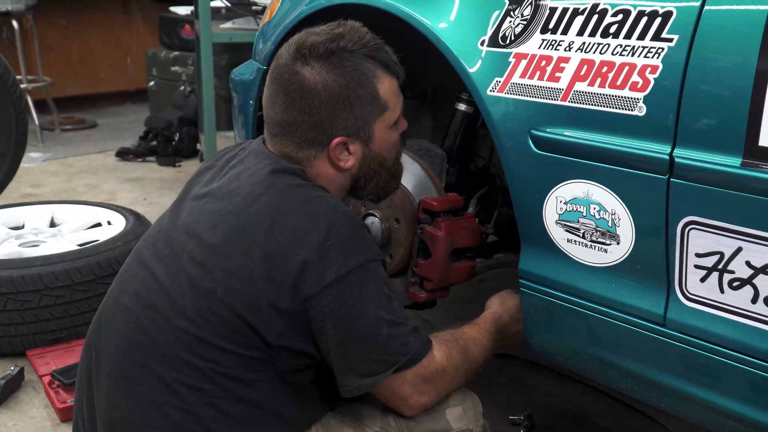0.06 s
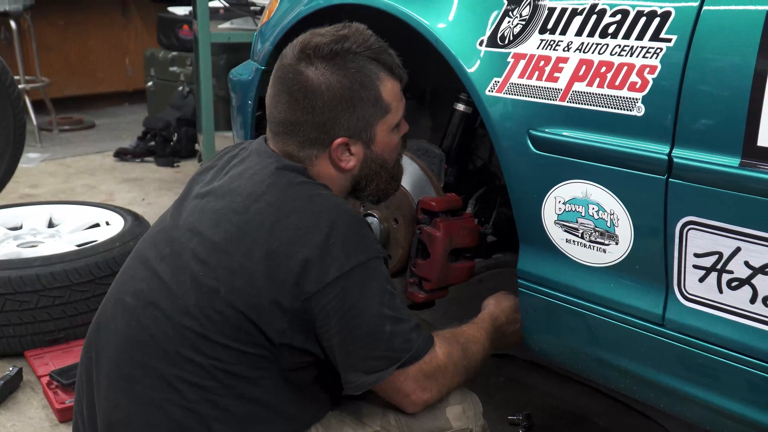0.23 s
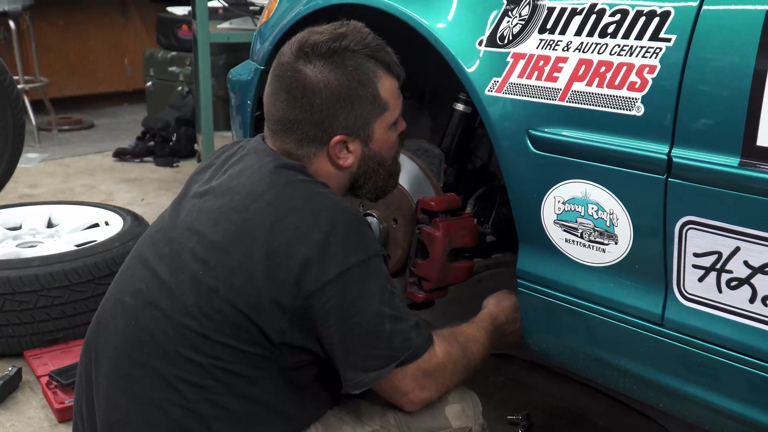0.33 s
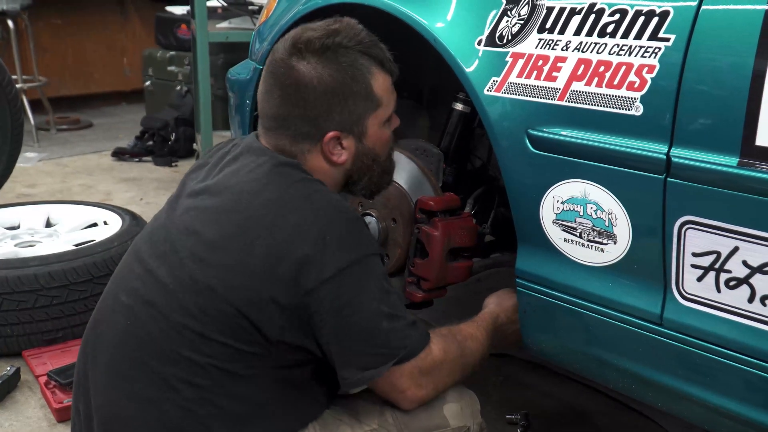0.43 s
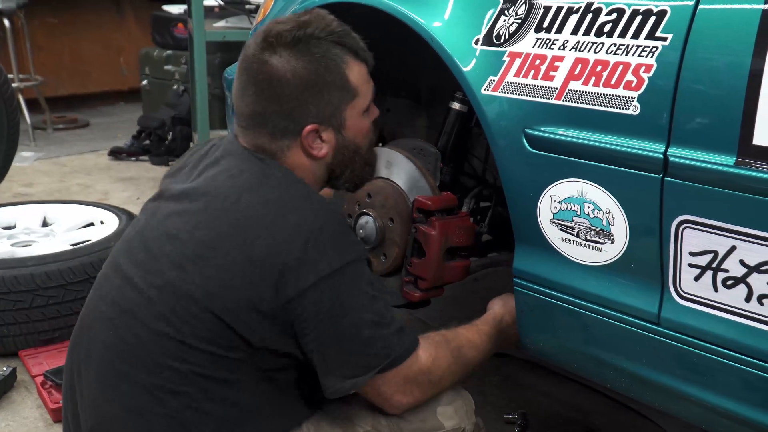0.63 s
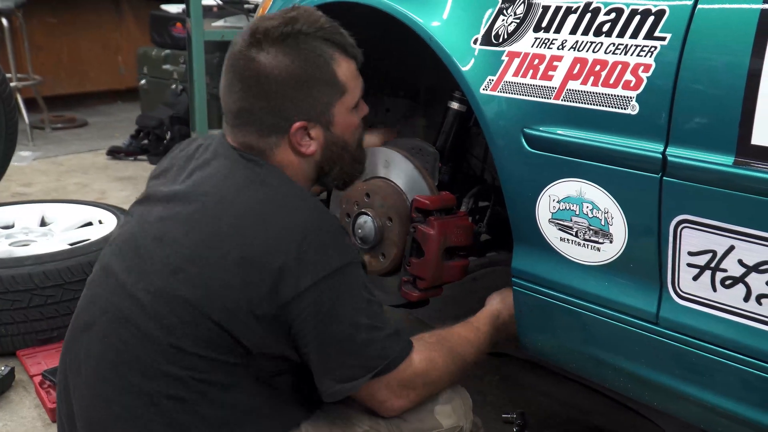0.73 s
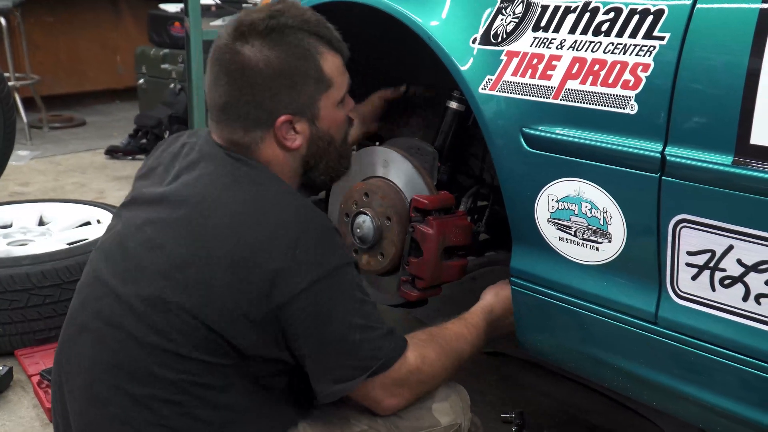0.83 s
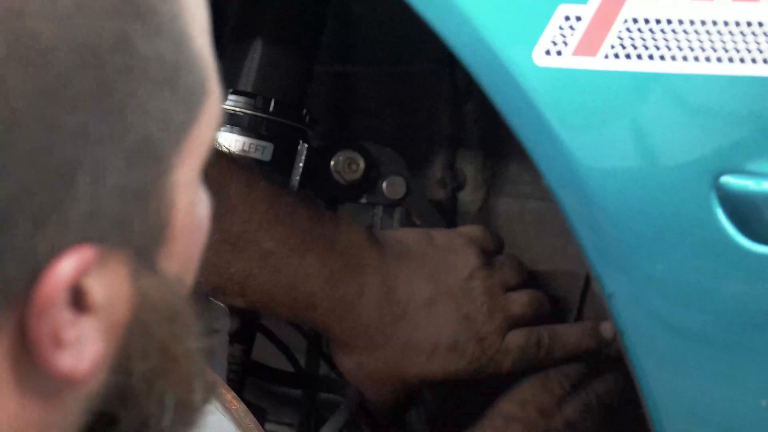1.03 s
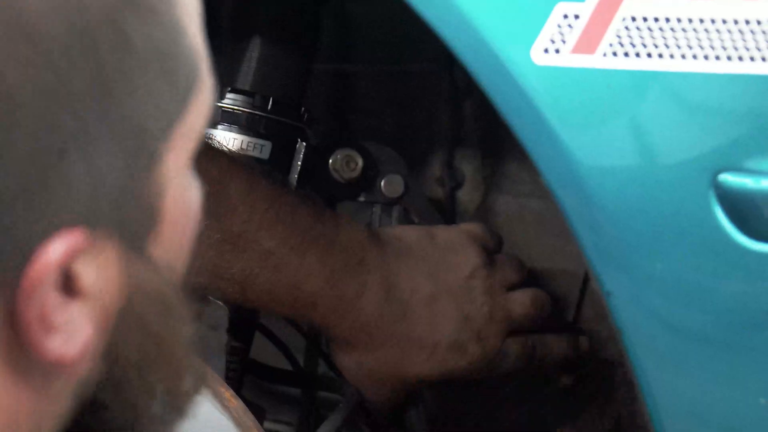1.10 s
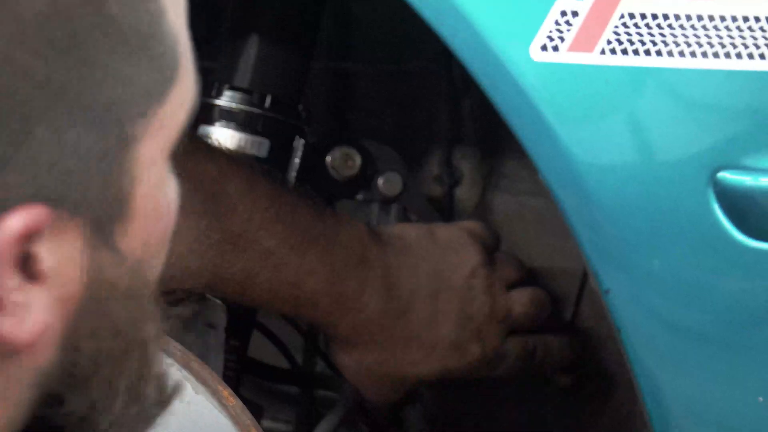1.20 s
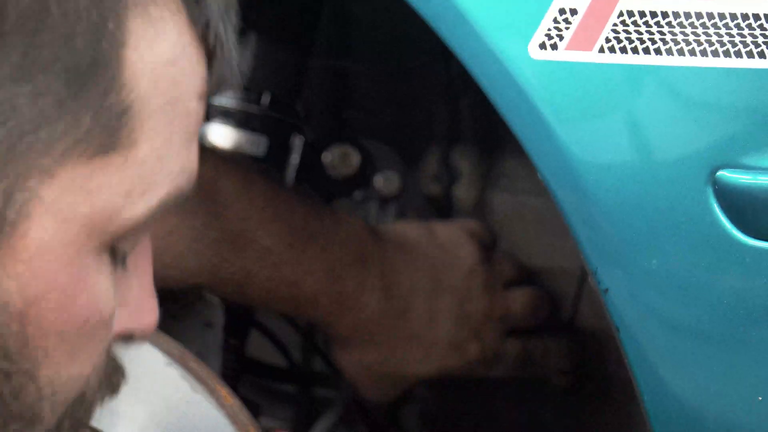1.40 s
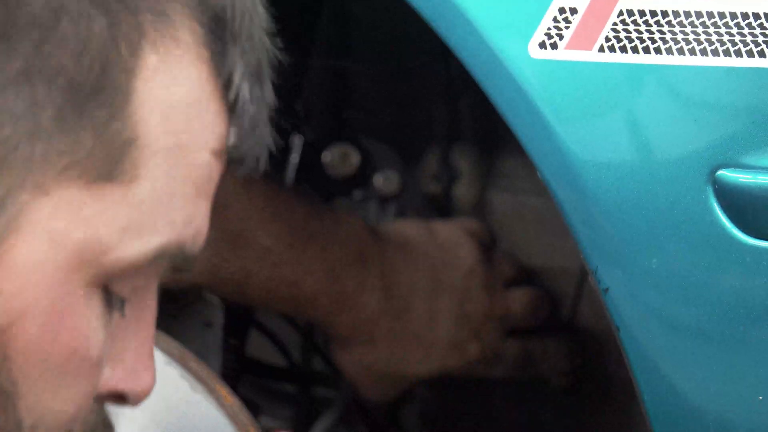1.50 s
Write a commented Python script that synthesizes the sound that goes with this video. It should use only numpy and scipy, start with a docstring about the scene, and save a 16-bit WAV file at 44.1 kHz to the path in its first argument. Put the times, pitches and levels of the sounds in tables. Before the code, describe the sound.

In a quiet garage, a rusty steel joint cracks loose with one quick creak and a short metallic ring. Faint handling ticks come after it, while the soft airy hum and hiss behind them abruptly get quieter.

```python
"""One short creaking crack in a garage, as a stuck steel suspension part gives way.
The joint sticks and slips about a dozen times within 60 ms: each slip excites the resonances of the
steel, rust grinds in the joint, and the room reverberates. Behind it lie a low rumble, fan-like air
noise and a thin hiss, which all drop abruptly after a second. Hand and tool make a few faint ticks,
and a sleeve brushes the car."""
import sys
import numpy as np
from scipy import signal
from scipy.fft import rfft, irfft
from scipy.io import wavfile

SR = 44100
rng = np.random.default_rng(int(sys.argv[2]) if len(sys.argv) > 2 else 0)


def transcribe(u):
    """Save the signal u as a 16-bit wav file named by the first command-line argument.

    u: samples, shape (n,) or (channels, n), limited to [-1, 1]; the rate is SR.
    q: integer samples, one column per channel.
    """
    v = np.clip(np.atleast_2d(u).T, -1, 1)
    q = np.round(v * 32767).astype(np.int16)
    wavfile.write(sys.argv[1], SR, q)


N = 68355
T = np.arange(N) / SR

# normal modes of the steel: pitch_hz, level_db, t60_s
STEEL_MODES = [(236, -39, .33), (296, -41, .5), (518, -39, .6), (795, -33, .52), (867, -39, .52),
               (1215, -32, .38), (1327, -32, .26), (1421, -39, .42), (1663, -37, .28), (1883, -34, .38),
               (2072, -34, .32), (2237, -35, .38), (2325, -24, .28), (2356, -32, .22), (2480, -29, .42),
               (2550, -22.5, .32), (2602, -30, .24), (2652, -30, .36), (2753, -30, .31), (2946, -35, .3),
               (4124, -42, .32), (4310, -37, .22), (4890, -42, .22), (8530, -45, .26), (8624, -46, .36),
               (9985, -46, .26)]


def from_db(db):
    """Decibels to amplitude ratio."""
    return 10 ** (np.asarray(db) / 20)


def rms_one(x):
    """Normalise to unit rms."""
    return x / np.sqrt(np.mean(x ** 2) + 1e-20)


def peak_at(x, db):
    """Normalise to a peak level."""
    return from_db(db) * x / (np.abs(x).max() + 1e-20)


def at_hz(points, hz):
    """Interpolate a table on a log-frequency axis."""
    frequencies, values = np.transpose(points)
    return np.interp(np.log(np.maximum(hz, 1)), np.log(frequencies), values)


def coloured(x, spectrum):
    """Minimum-phase filter of unit power gain: folding the cepstrum makes it causal."""
    size = 2 * N
    gain = rms_one(from_db(at_hz(spectrum, np.arange(N + 1) * SR / size)))
    cepstrum = irfft(np.log(gain))
    cepstrum[1:N] *= 2
    cepstrum[N + 1:] = 0
    return irfft(rfft(x, size) * np.exp(rfft(cepstrum)))[:N]


def resonate(x, hz, width_hz):
    """Damped oscillator: a two-pole resonance with unit peak gain."""
    radius = np.exp(-np.pi * width_hz / SR)
    feedback = [1, -2 * radius * np.cos(2 * np.pi * hz / SR), radius ** 2]
    return signal.lfilter(np.array([1, 0, -1]) * (1 - radius ** 2) / 2, feedback, x + 1e-18)


def band(x, hz, width_hz):
    """Two resonators in cascade, for steep skirts."""
    return resonate(resonate(x, hz, width_hz), hz, width_hz)


def background():
    """Broadband air noise plus narrowband noise from rumble to hiss; all step down together."""
    # air spectra before and after the drop: frequency_hz, density_db
    air_before = [(60, -2), (130, -4), (240, -7.5), (460, 3), (680, -6), (930, -1), (1150, -4),
                  (1450, -6.5), (1800, -8.5), (2750, -11.5), (3300, -12), (5500, -22), (8000, -25),
                  (16000, -39.5)]
    air_after = [(60, -10), (140, 2), (300, -2.5), (460, 6), (620, -4.5), (900, 0.5), (1150, -5.5),
                 (1450, -3.5), (2000, -7.5), (2800, -10.5), (4500, -14.5), (5700, -19.5), (8000, -24),
                 (12000, -29.5), (16000, -47)]
    # narrow noise bands: centre_hz, width_hz, before_db, after_db
    drones = [(26, 8.5, -43.5, -59.5), (902, 77, -67, -78), (1450, 40, -72.5, -84.5),
              (2691, 120, -73, -88.5), (6630, 480, -68, -81)]
    drop_s, crossfade_s, drift_db_per_s = 0.993, .006, -0.8
    before = from_db(-57.5 + drift_db_per_s * (T - drop_s)) * coloured(rng.standard_normal(N), air_before)
    after = from_db(-69) * coloured(rng.standard_normal(N), air_after)
    for hz, width_hz, before_db, after_db in drones:
        drone = rms_one(band(rng.standard_normal(2 * N), hz, width_hz)[N:])  # steady state only
        before += from_db(before_db) * drone
        after += from_db(after_db) * drone
    dropped = np.clip((T - drop_s) / crossfade_s + .5, 0, 1)
    return before * (1 - dropped) + after * dropped


def garage_reverb(x):
    """Diffuse field: dense reflections build up quickly, then decay exponentially in each band."""
    # reverberation time: frequency_hz, t60_s
    decay_times = [(150, 0.4), (500, 0.63), (1200, 0.53), (2600, 0.525), (5000, 0.67), (9000, 0.4846),
                   (15000, 0.63)]
    # strength of the reverberation: frequency_hz, level_db
    room_colour = [(100, 6), (250, -2.5), (450, 1.5), (750, 0.5), (1300, -1.5), (2000, -3.5), (2600, -12),
                   (3500, -2.5), (4400, -10), (8500, -2.5), (15000, -15)]
    delay_s, build_s = 0.00567, 0.004
    edges_hz = np.geomspace(80, 18000, 15)
    white = rng.standard_normal((2, N))
    age = np.maximum(T - delay_s, 0)
    response = np.zeros(N)
    for k, (low, high) in enumerate(zip(edges_hz, edges_hz[1:])):
        hz = np.sqrt(low * high)
        decay = (1 - np.exp(-age / build_s)) * from_db(-60 * age / at_hz(decay_times, hz))
        noise = signal.sosfilt(signal.butter(2, [low, high], "band", fs=SR, output="sos"), white[k % 2])
        response += from_db(at_hz(room_colour, hz)) * noise * decay / np.sqrt(np.sum(decay ** 2))
    return signal.fftconvolve(x, response)[:N]


def sleeve_brush():
    """Friction noise: cloth slides over the car in one soft Gaussian swell."""
    # spectrum of the rubbing: frequency_hz, density_db
    cloth_colour = [(800, -19), (2500, 4), (3700, 5.5), (5500, -12.5), (10000, -14), (16000, -22)]
    centre_s, sigma_s = 1.348, .02
    swell = np.exp(-.5 * ((T - centre_s) / sigma_s) ** 2)
    return from_db(-70) * swell * coloured(rng.standard_normal(N), cloth_colour)


def handling_ticks():
    """Light impacts of hand and tool: band-limited noise bursts with fast exponential decay."""
    # contacts: start_s, peak_db, centre_hz, t60_s
    contacts = [(0.037, -49.5, 12800, 0.032), (0.367, -50, 13400, .025), (0.379, -54, 12400, .18),
                (0.603, -54.5, 4280, 0.023), (1.122, -65, 4470, 0.022), (1.209, -65.5, 3500, 0.037)]
    ticks = np.zeros(N)
    for start_s, peak_db, hz, t60_s in contacts:
        decay = (T >= start_s) * from_db(-60 * np.maximum(T - start_s, 0) / t60_s)
        ticks += peak_at(band(rng.standard_normal(N) * decay, hz, width_hz=.5 * hz), peak_db)
    return ticks


def rust_grinding():
    """Brittle fracture: a snap thuds through the assembly, then rust crumbles as shot noise."""
    # spectrum of the fractures: frequency_hz, density_db
    grit_colour = [(100, -17), (220, -2.5), (700, 1.5), (1100, 1), (1500, -3.5), (2400, -12.5),
                   (3200, -0.5), (3700, -6), (4400, -5.5), (5300, -6.5), (6200, -17.5), (7400, -11),
                   (8700, -14), (11000, -21.5), (16000, -35.5)]
    # low resonances of the whole assembly: centre_hz, width_hz, peak_db
    thud_modes = [(222.5, 42, -31.5), (744, 90, -31.5)]
    snap_s, full_s, release_s = 0.1936, 0.223, 0.237
    rise_db_per_s, fall_db_per_s = 560, 900
    grains_per_s, spread_db = 2500, 5.5
    envelope_db = -rise_db_per_s * np.maximum(full_s - T, 0)
    envelope_db -= fall_db_per_s * np.maximum(T - release_s, 0)
    sizes = from_db(spread_db * np.minimum(rng.exponential(1, N), 2)) * rng.choice([-1, 1], N)
    grains = rms_one(sizes * (rng.random(N) < grains_per_s / SR))
    grains *= from_db(-25.5 + envelope_db) * (T > snap_s)
    snap = signal.unit_impulse(N, int(snap_s * SR))
    grit = coloured(grains, grit_colour) + peak_at(coloured(snap, grit_colour), db=-21)
    through_steel = sum(resonate(grit, hz, width_hz=.012 * hz) for hz, _, _ in STEEL_MODES)
    thud = sum(peak_at(resonate(resonate(snap, hz, width), hz, hz), db) for hz, width, db in thud_modes)
    return grit + from_db(4) * through_steel + thud


def stick_slip():
    """Stick-slip excitation: each slip knocks the damped body and adds energy to the ringing modes."""
    # slips of the joint: start_s, strength_db
    slips = [(0.1957, -11), (0.1999, -11), (0.2035, -17), (0.2093, -15), (0.2138, -2), (0.2177, -2),
             (0.2209, -2), (0.2257, -4), (0.2303, -11), (0.2345, 1), (0.2387, 1), (0.2440, -8),
             (0.2537, -7)]
    # broad, heavily damped resonances: centre_hz, width_hz, peak_db
    body_modes = [(230, 180, -30), (481, 250, -34), (900, 410, -31.5), (1333.3, 170, -25), (1950, 120, -23),
                  (2526, 580, -9.5), (4052, 540, -27)]
    contact_hz, attack_s = 4600, 0.00081
    start_s, strength_db = np.transpose(slips)
    impulses = np.zeros(N)
    impulses[(start_s * SR).astype(int)] = from_db(strength_db)
    force = signal.sosfilt(signal.butter(2, contact_hz, fs=SR, output="sos"), impulses + 1e-18)
    knocks = sum(peak_at(band(force, hz, width), db) for hz, width, db in body_modes)
    power = signal.lfilter([1], [1, -np.exp(-1 / (attack_s * SR))], impulses ** 2 + 1e-18)
    ringing = np.zeros(N)
    for hz, level_db, t60_s in STEEL_MODES:
        retained = from_db(-60 / (t60_s * SR)) ** 2  # share of the energy left after one sample
        energy = signal.lfilter([1], [1, -retained], power)
        ringing += peak_at(np.sqrt(energy), level_db) * np.sin(2 * np.pi * (hz * T + rng.random()))
    return knocks, from_db(-1) * ringing


def scene():
    """Superposition of all sources in mono; only the crack and the ticks excite the room."""
    knocks, ringing = stick_slip()
    crack = knocks + rust_grinding()
    ticks = handling_ticks()
    room = garage_reverb(crack + from_db(2.5) * ticks)
    return (crack + ringing + ticks + sleeve_brush() + room + background())[None]


def record(dry):
    """Band limiting: a steep elliptic low-pass removes the highest treble."""
    cutoff_hz = 16000
    return signal.sosfilt(signal.ellip(12, .1, 80, cutoff_hz, fs=SR, output="sos"), dry)


dry = scene()
out = record(dry)
transcribe(out)
```